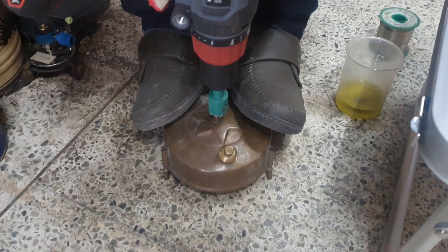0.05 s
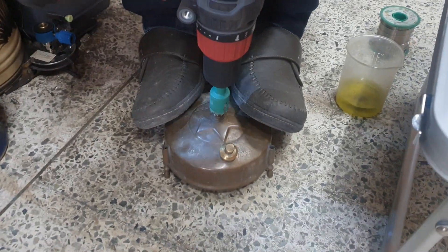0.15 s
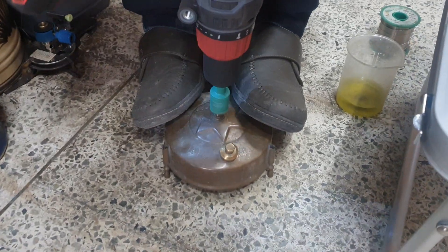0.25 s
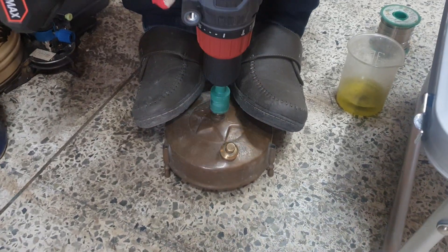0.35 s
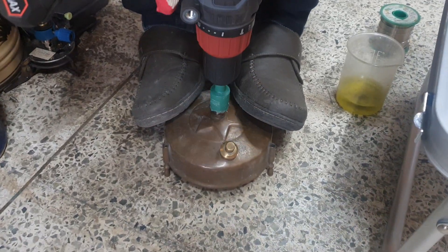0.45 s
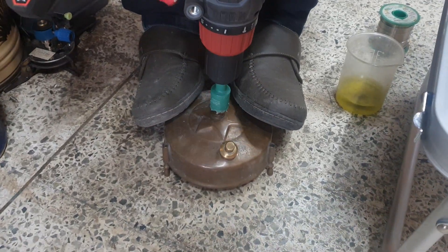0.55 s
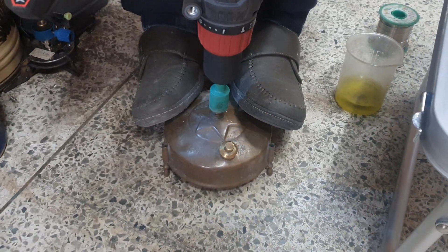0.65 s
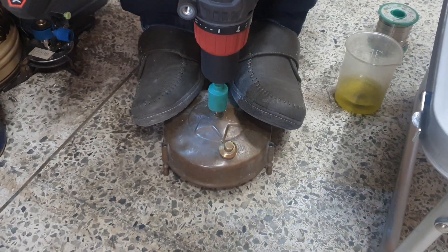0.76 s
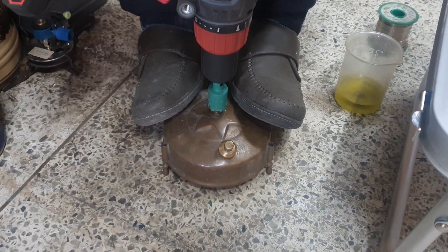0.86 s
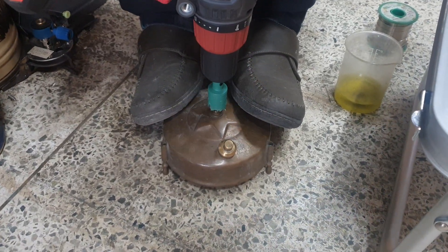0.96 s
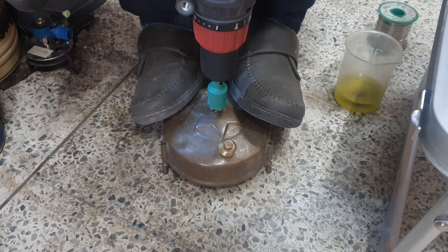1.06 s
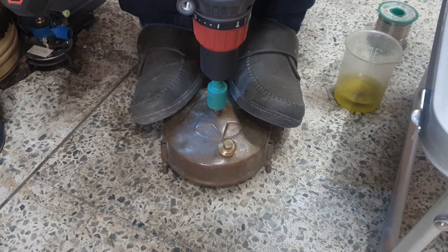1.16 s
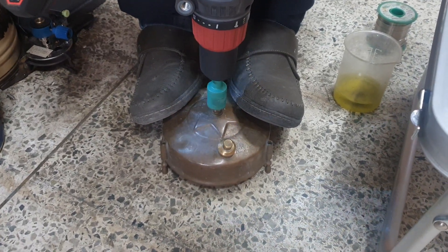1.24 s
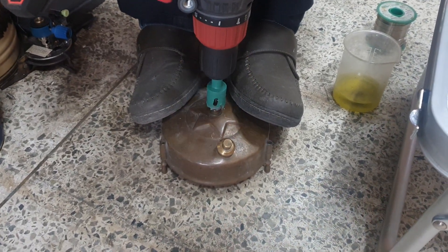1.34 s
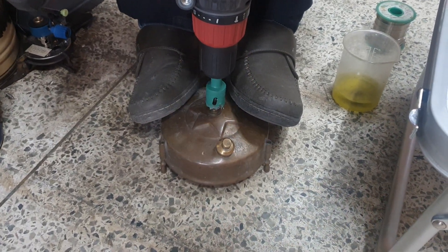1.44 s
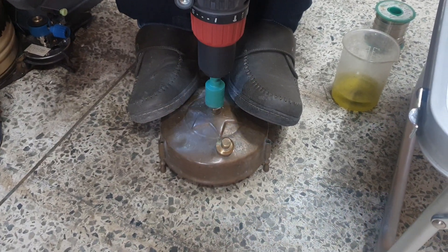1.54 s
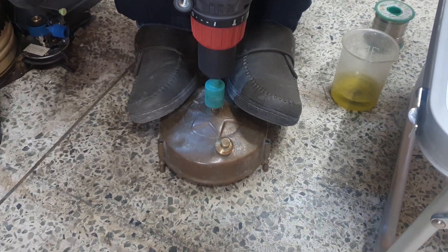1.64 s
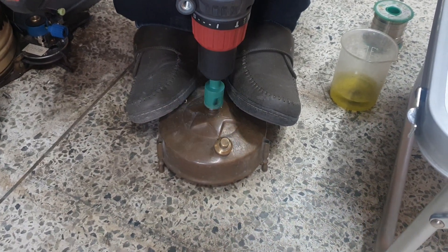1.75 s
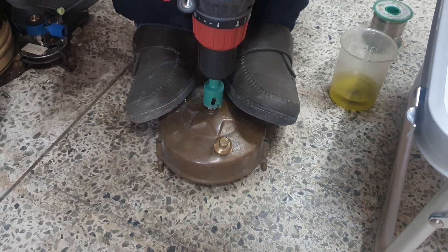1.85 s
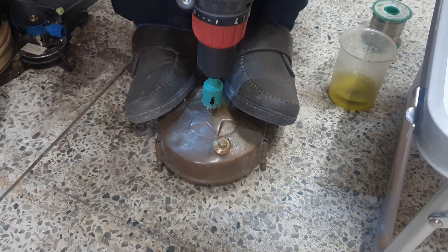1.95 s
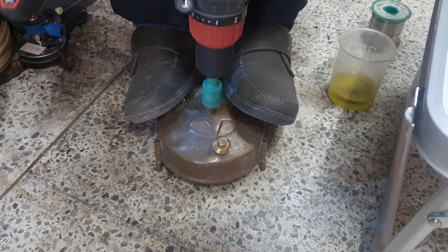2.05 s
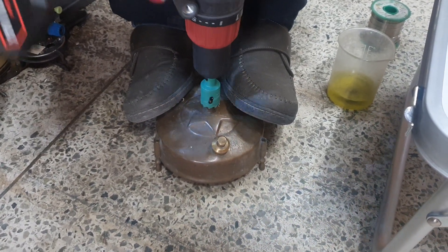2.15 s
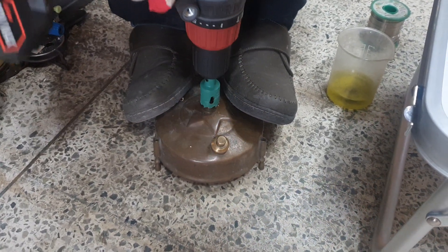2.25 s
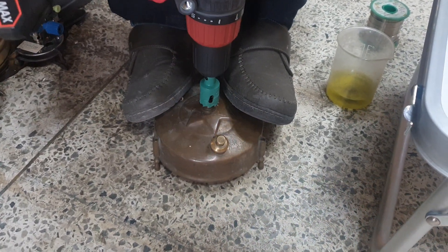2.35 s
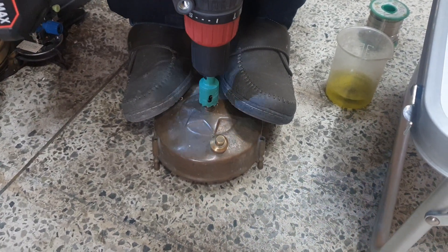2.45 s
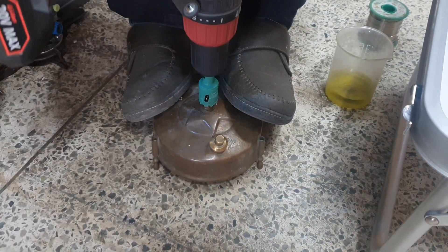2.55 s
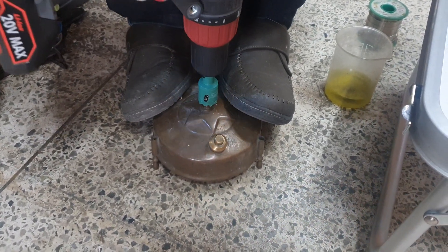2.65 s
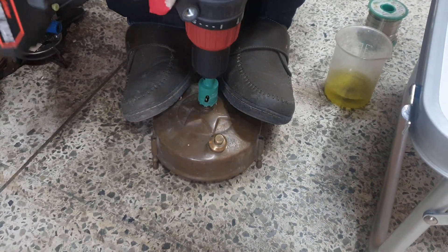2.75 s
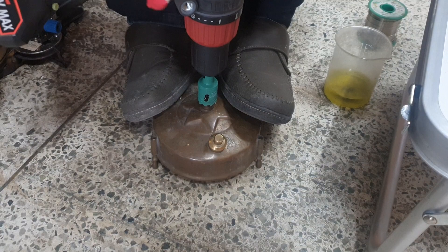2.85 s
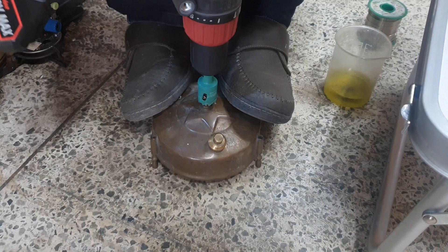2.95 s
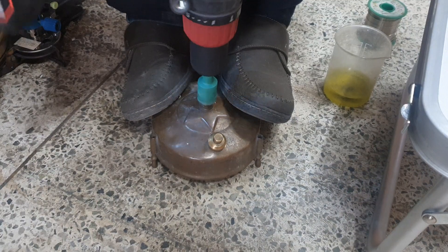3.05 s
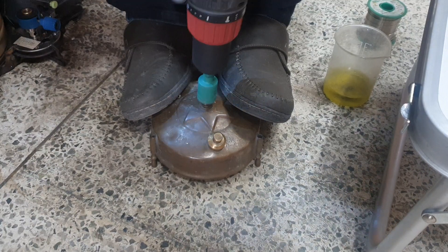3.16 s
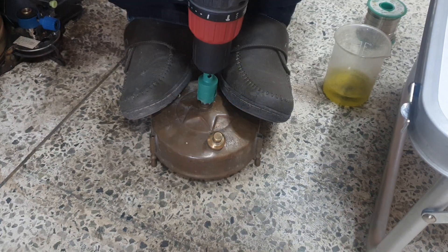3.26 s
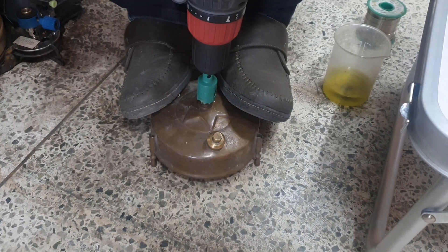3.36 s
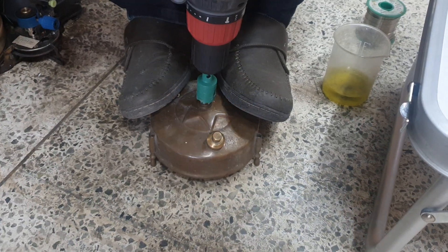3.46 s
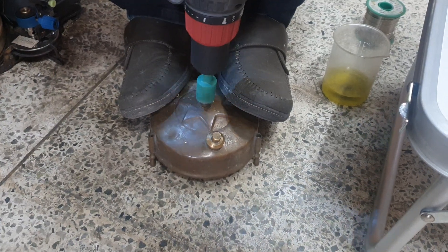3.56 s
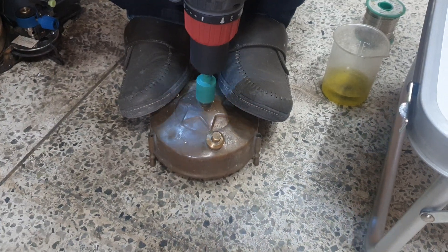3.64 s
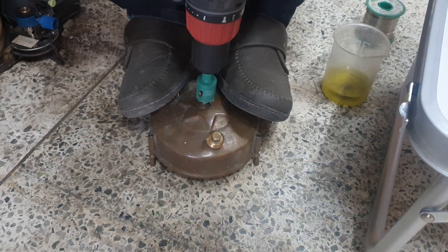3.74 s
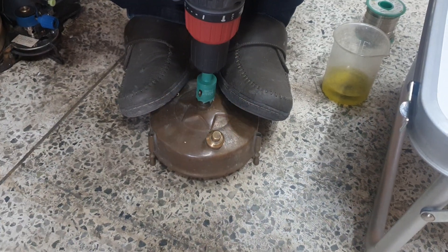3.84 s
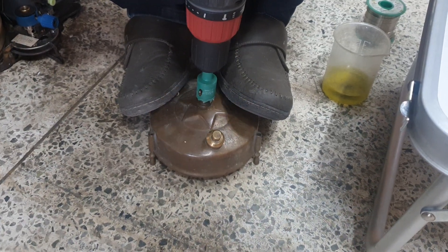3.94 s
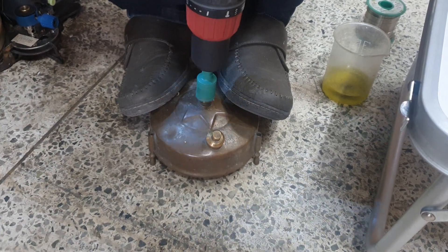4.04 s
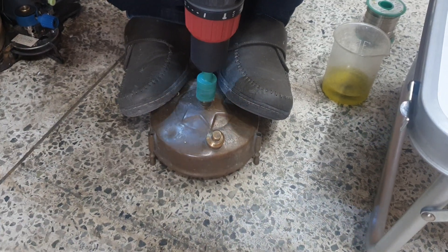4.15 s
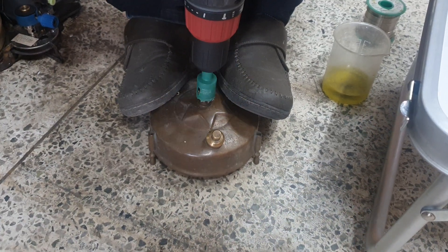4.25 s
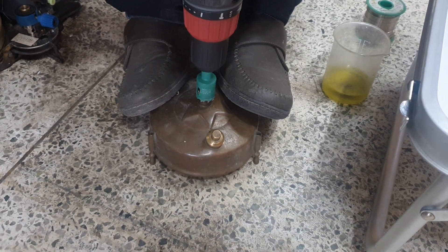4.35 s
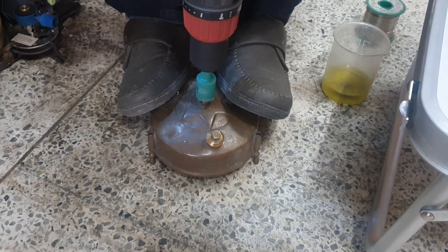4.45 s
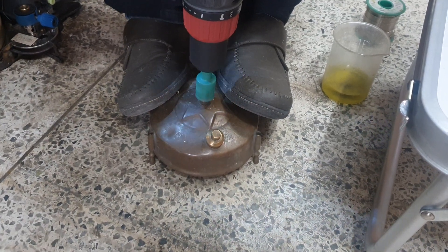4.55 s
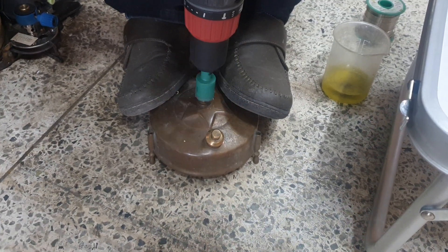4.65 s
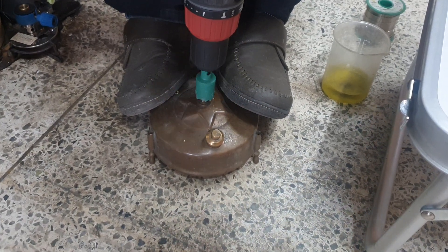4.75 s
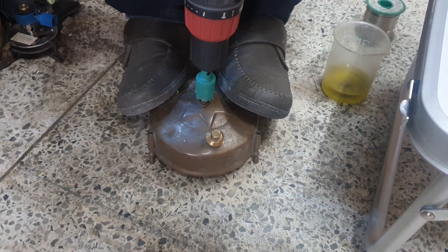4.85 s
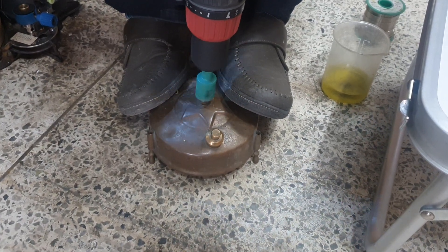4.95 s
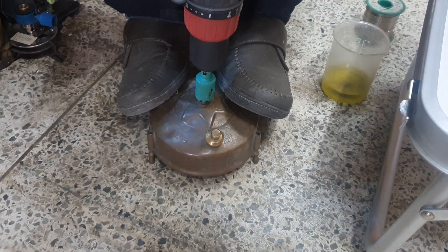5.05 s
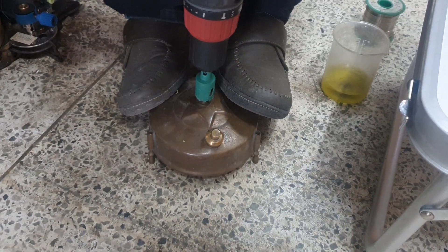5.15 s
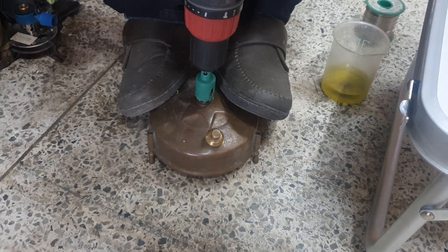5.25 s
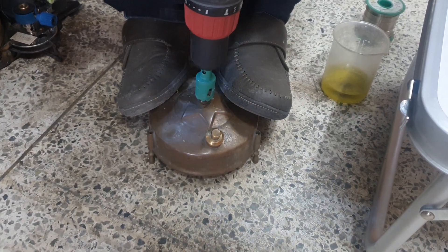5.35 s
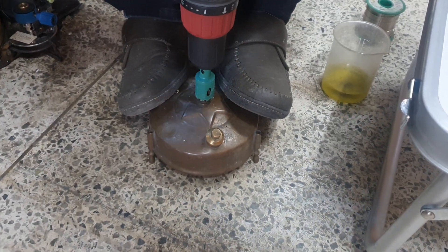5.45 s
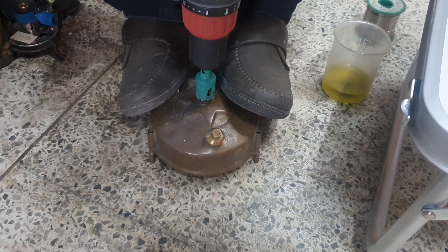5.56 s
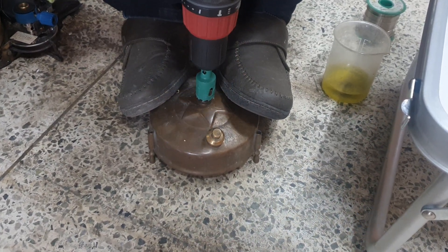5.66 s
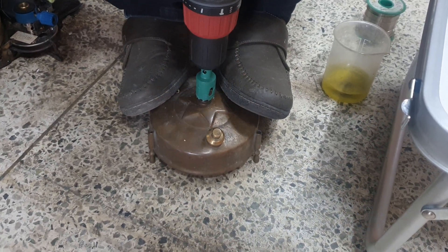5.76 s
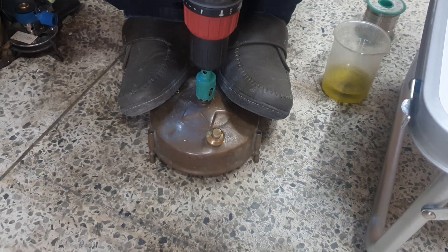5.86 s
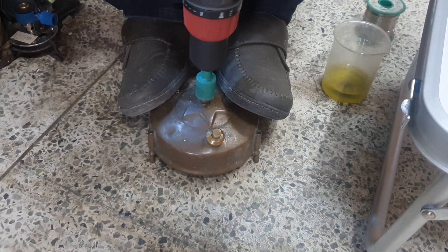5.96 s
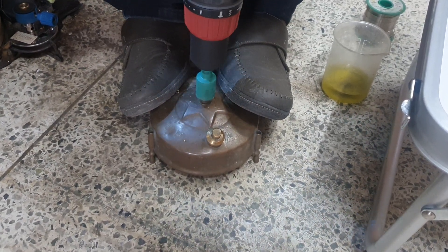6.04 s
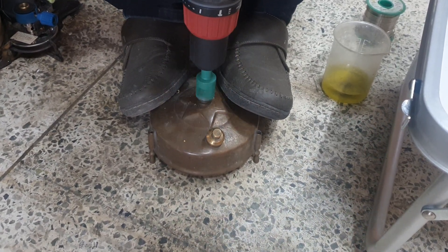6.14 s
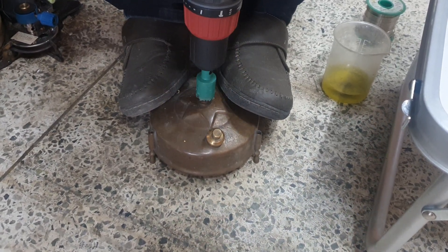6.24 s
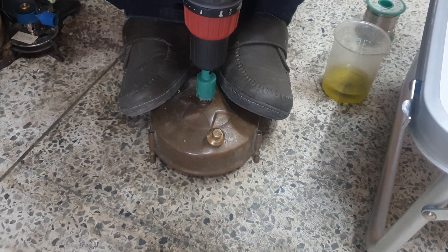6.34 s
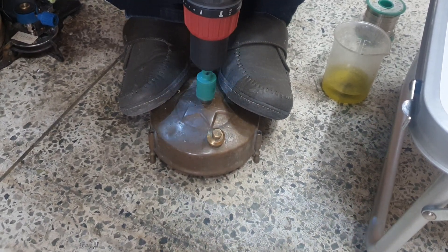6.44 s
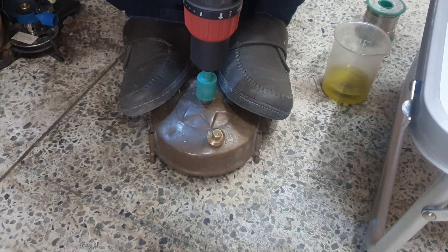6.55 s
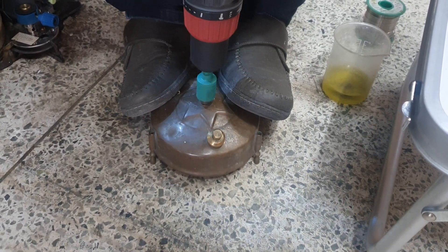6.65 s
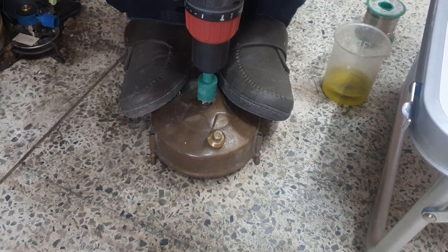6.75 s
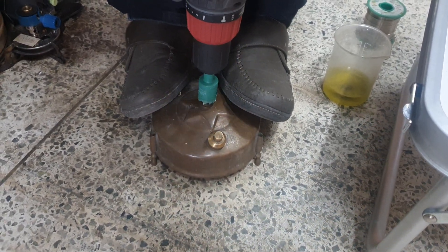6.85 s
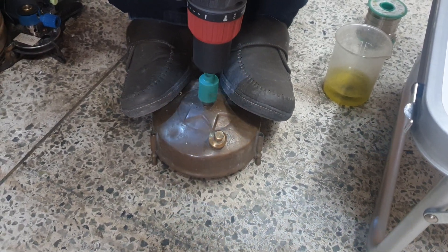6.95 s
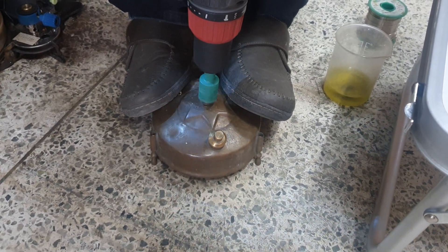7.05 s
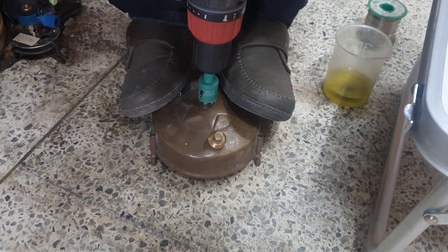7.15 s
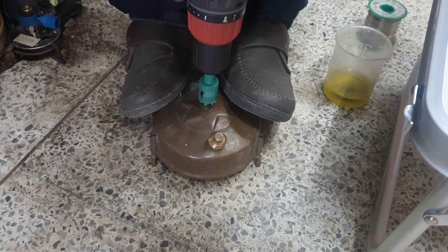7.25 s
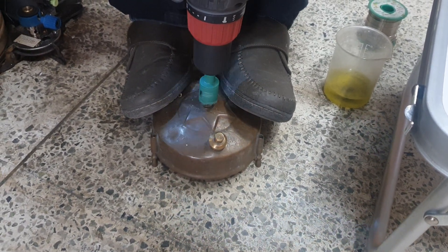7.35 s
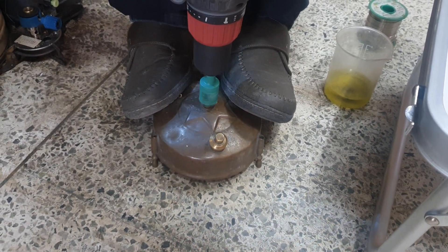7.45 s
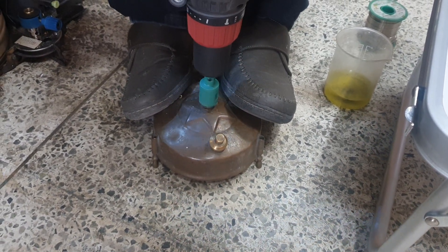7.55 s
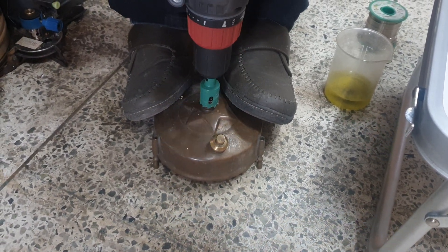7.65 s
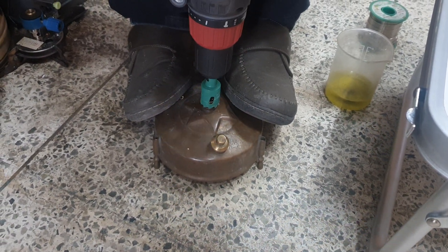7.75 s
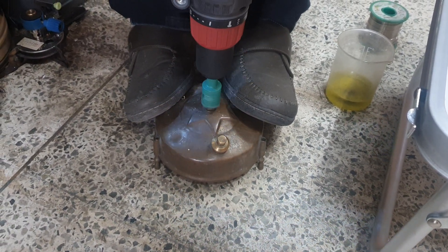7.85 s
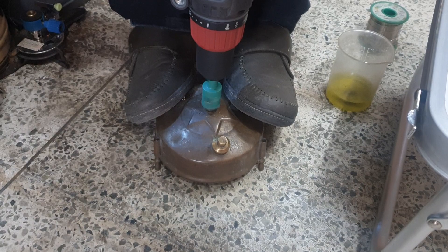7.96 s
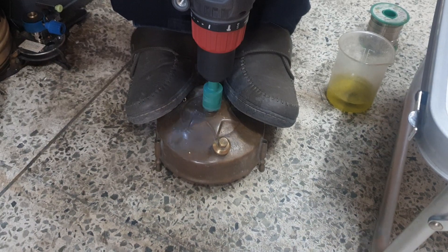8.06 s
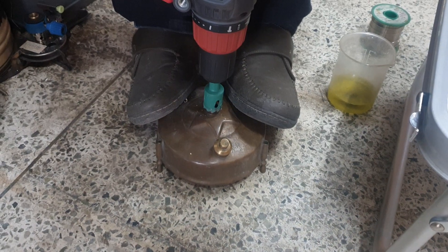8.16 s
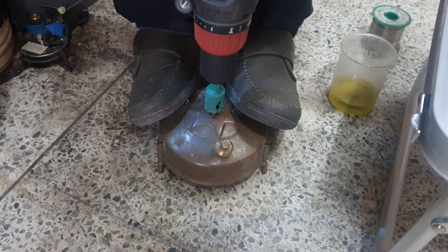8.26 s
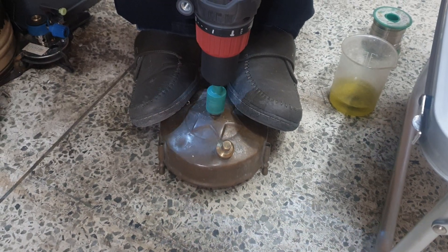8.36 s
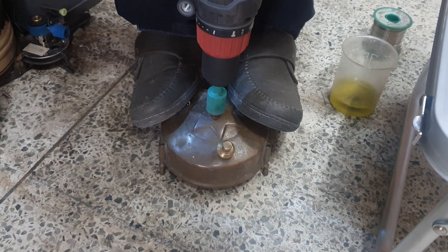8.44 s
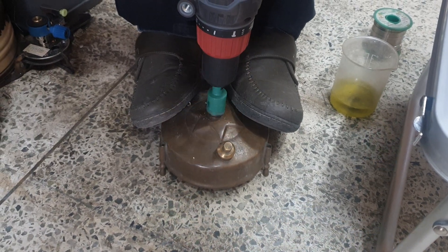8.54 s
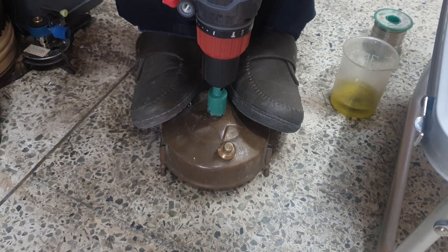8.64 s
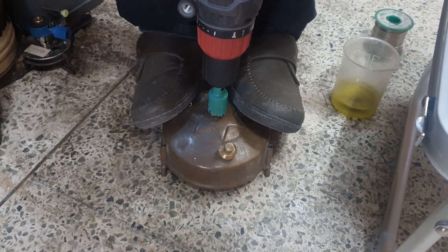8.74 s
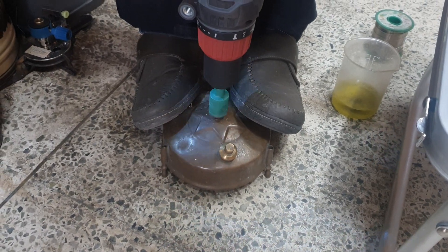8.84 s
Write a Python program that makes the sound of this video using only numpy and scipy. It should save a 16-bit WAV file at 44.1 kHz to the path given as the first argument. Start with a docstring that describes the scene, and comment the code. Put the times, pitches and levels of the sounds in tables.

```python
"""In a room with a stone floor, a cordless drill turns a hole saw on a small metal fuel tank held between
two feet. With each short pull of the trigger the gears whine up and the teeth rasp through the sheet,
ringing the tank. The saw catches with a crack, squeaks as it sticks and slips, and rings as it springs
free. The tank knocks on the floor, the stalled motor whistles faintly, and a low hum fills the room."""
import sys
import numpy as np
from scipy import signal
from scipy.fft import rfft, irfft
from scipy.io import wavfile
from scipy.ndimage import uniform_filter1d

SR = 44100
rng = np.random.default_rng(int(sys.argv[2]) if len(sys.argv) > 2 else 0)


def unload_audio(sound):
    """Save the sound as a 16-bit wav file, at the path given as the first command line argument."""
    columns = np.transpose(np.atleast_2d(sound))
    # keep every value between -1 and 1, then stretch to whole-number steps
    steps = np.round(np.clip(columns, -1, 1) * 32767)
    wavfile.write(sys.argv[1], SR, steps.astype(np.int16))


N = 392490
TIME = np.arange(N) / SR
CUTOFF_HZ = 16000
USUAL_HZ, USUAL_DB = 2300, -23  # whine pitch and cutting force of a typical pull

# Trigger pulls; in the brief, slow ones the saw barely turns:
# start_s, release_s, force_db, early_whine_hz, late_whine_hz
PULLS = [(0.251, 0.412, -27.5, 2600, 2500), (0.718, 0.874, -25.5, 2545, 2445),
         (1.156, 1.343, -27.5, 2303, 2444), (1.6, 1.81, -25, 2326, 2290), (2.053, 2.202, -22.5, 1930, 1700),
         (2.541, 2.57, -40, 450, 450), (2.768, 2.768, -44.5, 452, 450), (3.005, 3.039, -43, 600, 600),
         (3.1, 3.279, -23.5, 2550, 2650), (3.581, 3.78, -22, 2623, 2600), (4.06, 4.279, -23, 2147, 2396),
         (4.521, 4.707, -22.5, 2198, 2305), (4.954, 5.106, -24.5, 3000, 1504),
         (5.411, 5.42, -37.5, 507, 496), (5.653, 5.657, -44, 290, 303), (5.955, 6.003, -28, 1677, 1700),
         (5.992, 6.221, -24.5, 2450, 2779), (6.514, 6.743, -23.5, 2572, 2700),
         (6.976, 7.178, -22, 2293, 2200), (7.439, 7.64, -22, 3300, 2100), (7.894, 8.136, -23, 1300, 2053),
         (8.364, 8.608, -22, 2200, 2246), (8.855, 8.95, -26.5, 1800, 1790)]
# Tone colour of teeth on sheet metal: frequency_hz, gain_db
RASP_SPECTRUM = [(120, -33.5), (204, -2), (390, -16.5), (546, -3.5), (698, -4.5), (1030, -4.5), (1370, -9),
                 (1680, -3), (2590, -5), (3520, -7.5), (7200, -15), (8660, -8.5), (12000, -16),
                 (15500, -20.5)]


def rasp(force, treble, boom, pitch, teeth_per_cycle=.06):
    """Chips break off in surges as each tooth passes; they hiss directly and ring the tank."""
    tooth_hz = pitch * teeth_per_cycle * (1 + .12 * drift(40))
    tooth = np.sin(2 * np.pi * np.cumsum(tooth_hz) / SR)
    bite = force * from_db(0.75 * drift(240) - tooth)  # judder and tooth ripple, in dB
    fractures = spread(chips(per_s=16000, size_db=0.5), chips(per_s=30000, size_db=3.0))
    scrape = rms_one(colour(fractures, RASP_SPECTRUM))
    low, rest = crossover(scrape, hz=1100)
    middle, high = crossover(rest, hz=6430)
    body = from_db(-5.0) * boom * low
    hiss = treble * from_db(7.0 + 0.6 * drift(60)) * high
    return bite * (body + middle + hiss) + tank_ring(bite, boom)


def chips(per_s, size_db):
    """Tiny fractures of the sheet: random clicks, a few much larger than the rest."""
    sizes = from_db(size_db * np.minimum(rng.exponential(1, N), 5))
    return rms_one(sizes * rng.standard_normal(N) * (rng.random(N) < per_s / SR))


def tank_ring(bite, boom, boom_below_hz=1500):
    """Small blows ring the shell; its low modes answer most to how the saw leans on it."""
    # Resonances of the shell: pitch_hz, width_hz, level_db
    tank_modes = [(238, 190, -20), (547, 74, -13), (981, 77, -15), (1113, 69, -15.5), (1684, 43, -10.5),
                  (2598, 260, -5.5)]
    blows = bite * spread(chips(per_s=5000, size_db=2.0), chips(per_s=5000, size_db=1.5))
    ring = 0
    for hz, width_hz, db in tank_modes:
        drive = blows * boom if hz < boom_below_hz else blows
        ring += from_db(db) * np.sqrt(SR / np.pi / width_hz) * resonate(drive, hz, width_hz)
    return from_db(-2.5) * ring / np.sqrt(2)


def pressure(ease_s=0.053, bite_hz_per_s=53600):
    """The teeth bite in, cut and run out; a fast saw hisses, a labouring one makes the tank boom."""
    force, treble, boom = np.zeros((3, N))
    for start, release, db, _, hz in PULLS:
        now = (TIME > start) & (TIME < release + 6 * ease_s)
        biting = (1 - np.exp(-(TIME[now] - start) * bite_hz_per_s / hz)) ** 1.77
        running_out = np.exp(-(np.maximum(TIME[now] - release, 0) / ease_s) ** 3.2)
        force[now] += from_db(db) * biting * running_out
        faster_khz = (hz - USUAL_HZ) / 1000
        treble[now] = from_db(-3.5 + 4.5 * faster_khz)
        boom[now] = from_db(-0.5 - 4.0 * faster_khz)
    return force, treble, boom


def snag(start_s=0.321, rise_s=0.022, decay_s=0.041, force_db=-15.5):
    """Early on the saw snags and chatters across the smooth sheet: extra force flares and dies away."""
    t = np.maximum(TIME - start_s, 0)
    return from_db(force_db) * np.minimum(t / rise_s, 1) * np.exp(-np.maximum(t - rise_s, 0) / decay_s)


def grit(surge_db=1.2, per_s=22):
    """The hiss of the teeth swells and sinks as the saw rocks in its groove."""
    trim_db = np.log(10) / 20 * surge_db ** 2  # holds the average power steady
    return from_db(surge_db * drift(per_s) - trim_db)


def motor(lag_s=.018, spin_up_s=.033, loaded_s=.085, brake_s=.085, fade_db_per_s=25):
    """The motor runs up, follows the load and brakes: pitch, level and growl for the gears."""
    pitch, whine_db, growl_db = np.zeros((3, N))
    for start, release, db, early_hz, late_hz in PULLS:
        now = TIME > start
        t, coasting = TIME[now] - start, np.maximum(TIME[now] - release, 0)
        rising = 1 - np.exp(-np.maximum(t - lag_s, 0) / spin_up_s)
        loaded_hz = np.interp(t, [loaded_s, max(release - start, loaded_s)], [early_hz, late_hz])
        braking = np.maximum(1 - (coasting / brake_s) ** 2, 0)
        pitch[now] = loaded_hz * rising * braking
        # A firmer pull sings out more; as the motor bogs down, whine gives way to slow-gear growl.
        whine_db[now] = -7.0 + .7 * (db - USUAL_DB) - fade_db_per_s * coasting
        growl_db[now] = 5.5 * max(early_hz - late_hz, 0) / 1000
    return pitch, from_db(whine_db), growl_db


def gears(force, pitch, whine, growl_db, wobble=.019, rough_db=3.8, housing_hz=1550):
    """The gearbox sings, wavering with the load; its housing radiates little at low speed."""
    # Tones of the gear train: pitch_ratio, level_db
    gear_tones = [(.25, -13.5), (.5, -11.5), (.75, -21), (1, 3)]
    phase = 2 * np.pi * np.cumsum(pitch * (1 + wobble * drift(110))) / SR
    tones = 0
    for ratio, db in gear_tones:
        tilt_db = growl_db if ratio < 1 else -growl_db / 2
        tones += from_db(db + tilt_db + rough_db * drift(90)) * np.sin(ratio * phase)
    return force * whine * np.minimum(pitch / housing_hz, 1) ** 5 * tones


def catches(crack_s=0.0062, rattle_s=.014, rattle_db=-9.5, bright_hz=5000):
    """A caught tooth lets go with a crack and a short rattle of the sheet."""
    # Teeth catching hard on the rim of the cut: start_s, level_db, treble_db
    hard_catches = [(0.276, -16, 0.5), (0.336, -11.5, 1.5), (0.739, -23, 2), (2.478, -46, 5.5),
                    (2.555, -22, 4.5), (2.662, -38, -17), (2.718, -44, -12), (2.794, -31, -13),
                    (3.021, -24.5, -1), (3.393, -31, -8), (5.734, -31, 0), (5.79, -37.5, -24),
                    (5.814, -29, -23), (5.972, -15.5, -2.5), (5.984, -6, 0.5), (6.289, -20, 12),
                    (6.532, -21.5, 11), (6.805, -32, -8)]
    # Every pull opens with a clack as the teeth take up the slack.
    clacks = [(start + .014, -33.5 + 0.22 * (db - USUAL_DB), -7) for start, _, db, _, _ in PULLS]
    out, t = np.zeros((2, N)), TIME[:SR // 6]
    envelope = np.exp(-t / crack_s) + from_db(rattle_db) * np.exp(-t / rattle_s)
    for start, db, treble_db in hard_catches + clacks:
        crack = rng.standard_normal((2, len(t))) * envelope
        dull = signal.lfilter(*signal.butter(1, bright_hz, fs=SR), crack)
        add(out, start, from_db(db - 9.5) * (dull + from_db(treble_db) * (crack - dull)))
    return butter(colour(spread(*out), RASP_SPECTRUM), 270, "high") * 2


def squeaks(jitter=.038):
    """The saw sticks and slips, giving brief, unsteady tones with overtones."""
    # Stick-slip squeals: peak_s, half_width_s, pitch_hz, level_db, overtone_db
    slips = [(0.36, 0.046, 4620, -23.5, 5), (0.37, 0.028, 2550, -16.5, -10),
             (2.557, 0.0017, 2890, -24, -24), (3.177, 0.0077, 13900, -17, -10),
             (5.127, 0.035, 4395, -25, -20), (6.295, 0.013, 4520, -31.5, 6.5),
             (6.81, 0.0079, 4950, -23.5, 3.5), (7.646, 0.015, 14100, -23, -10)]
    out = np.zeros(N)
    wavering_time = np.cumsum(1 + jitter * drift(350)) / SR
    for peak, half_width, hz, db, overtone_db in slips:
        near = abs(TIME - peak) < np.pi * half_width
        phase = 2 * np.pi * hz * wavering_time[near]
        partials = enumerate(from_db([0, overtone_db, overtone_db - 7.5]), 1)
        tone = sum(gain * np.sin(k * phase) for k, gain in partials if k * hz < CUTOFF_HZ)
        out[near] += from_db(db) * np.exp(-((TIME[near] - peak) / half_width) ** 2) * tone
    return out


def cup_ring(sustain=1.28, low_hz=5000):
    """Freed from the cut, the saw's steel cup rings on in its own modes."""
    # The cup springs free: start_s, level_db, low_mode_gain_db
    releases = [(0.41, -31, 6.5), (4.314, -30, -26)]
    # Modes of the cup: pitch_hz, level_db, base_t60_s (stretched by sustain)
    cup_modes = [(2099, -7, .32), (2455, -17, .31), (3241, -21, .29), (8800, 1, .24)]
    out, t = np.zeros(N), TIME[:SR // 2]
    for start, level_db, low_db in releases:
        for hz, db, t60 in cup_modes:
            envelope_db = level_db + db + low_db * (hz < low_hz) - 60 * t / (t60 * sustain)
            add(out, start, from_db(envelope_db) * np.sin(2 * np.pi * hz * t))
    return out


def bumps(thud_hz=170, width_hz=130, decay_s=0.013):
    """Soft, low knocks of the tank against floor and shoes."""
    # The tank rocks: start_s, level_db
    knocks = [(2.235, -30), (5.099, -31), (6.865, -41.5), (6.918, -42.5), (6.969, -39.5), (7.691, -33.5),
              (8.177, -37)]
    out, t = np.zeros(N), TIME[:SR // 8]
    for start, db in knocks:
        add(out, start, from_db(db + 21.5) * rng.standard_normal(len(t)) * np.exp(-t / decay_s))
    return butter(resonate(out, thud_hz, width_hz), 350, "low")


def drive_whistle():
    """The switched current sings in the windings of the stalled motor."""
    # Stalls of the saw: start_s, end_s, level_db
    stalls = [(2.62, 2.79, -64), (5.485, 5.678, -76)]
    gate = sum(from_db(db) * ((TIME > start) & (TIME < end)) for start, end, db in stalls)
    return uniform_filter1d(gate, SR // 100) * narrow_noise(N, hz=11550, width_hz=70)


def room(x, wet_db, predelay_s=.006):
    """Diffuse reflections off stone and walls, dying sooner in the treble."""
    # Reverb decay: frequency_hz, t60_s
    decay_times = [(200, 0.31), (2000, 0.21), (6000, 0.2), (15000, 0.16)]
    t, edges = TIME[:SR * 2 // 3], np.geomspace(100, CUTOFF_HZ, 8)
    tail = 0
    for low, high in zip(edges, edges[1:]):
        bandpass = signal.butter(2, [low, high], "band", fs=SR, output="sos")
        band = signal.sosfilt(bandpass, rng.standard_normal((2, len(t))))
        tail += band * from_db(-60 * t / at_hz(decay_times, np.sqrt(low * high))) * (t > predelay_s)
    return from_db(wet_db) * signal.fftconvolve(x, rms_one(tail) / np.sqrt(len(t)), axes=1)[:, :N]


def background(hum_hz=64, hum_db=-57.5, rumble_db=-60.5, air_db=-64.5):
    """A wavering low hum and a diffuse rumble over the quiet air of the room."""
    # Room tone: frequency_hz, gain_db
    air_spectrum = [(25, 12), (45, -3.5), (80, 2.5), (130, 0.5), (400, -8.5), (900, -21.5), (1700, -12.5),
                    (2600, -16.5), (6300, -28), (10000, -16.5), (15000, -26)]
    air = rms_one(colour(spread(*rng.standard_normal((2, N))), air_spectrum))
    hum_phase = 2 * np.pi * np.cumsum(hum_hz + 2 * drift(9)) / SR
    hum = np.sqrt(2) * np.sin(hum_phase) * from_db(2.5 * drift(9))
    rumble = narrow_noise((2, N), hz=54, width_hz=22)
    return from_db(air_db) * air + from_db(hum_db) * hum + from_db(rumble_db) * rumble


def spread(centre, side):
    """Two unrelated sounds become a stereo pair, alike in the bass and wider in the treble."""
    # Likeness of left and right: frequency_hz, correlation
    likeness = [(100, .9), (700, 0.77), (1500, 0.7), (3000, 0.29), (14000, 0.46)]
    mid = colour(centre, [(hz, 10 * np.log10(1 + alike)) for hz, alike in likeness])
    width = colour(side, [(hz, 10 * np.log10(1 - alike)) for hz, alike in likeness])
    return mid + width * [[1], [-1]]


def colour(x, spectrum, size=4096):
    """Minimum-phase EQ through (frequency_hz, gain_db) points."""
    cepstrum = irfft(np.log(from_db(at_hz(spectrum, np.arange(size // 2 + 1) * SR / size))))
    cepstrum[1:size // 2] *= 2
    cepstrum[size // 2 + 1:] = 0
    impulse = irfft(np.exp(rfft(cepstrum)))
    return signal.fftconvolve(np.atleast_2d(x), impulse[None], axes=1)[:, :N]


def narrow_noise(shape, hz, width_hz):
    """Pitched noise of unit power: white noise through the same resonance twice."""
    return rms_one(resonate(resonate(rng.standard_normal(shape), hz, width_hz), hz, width_hz))


def resonate(x, hz, width_hz):
    """A resonance with unity gain at its peak."""
    r = np.exp(-np.pi * width_hz / SR)
    feedback = [1, -2 * r * np.cos(2 * np.pi * hz / SR), r * r]
    return signal.lfilter(np.array([1, 0, -1]) * (1 - r * r) / 2, feedback, x + 1e-18)


def crossover(x, hz):
    """Split into a low and a high part that add up flat."""
    return butter(butter(x, hz, "low"), hz, "low"), butter(butter(x, hz, "high"), hz, "high")


def butter(x, hz, kind):
    """Second-order low- or high-pass."""
    return signal.sosfilt(signal.butter(2, hz, kind, fs=SR, output="sos"), x)


def drift(rate_hz):
    """Smooth random wander of unit power that changes at about the given rate."""
    knots = rng.standard_normal(N // 8)
    return rms_one(np.interp(TIME * rate_hz * 2, np.arange(len(knots)), knots))


def at_hz(points, hz):
    """Read a table on a log-frequency axis."""
    frequencies, values = np.array(points).T
    return np.interp(np.log(np.maximum(hz, 1)), np.log(frequencies), values)


def add(out, start_s, sound):
    """Mix a short sound in at a time."""
    i = max(int(start_s * SR), 0)
    out[..., i:i + sound.shape[-1]] += sound[..., :max(N - i, 0)]


def from_db(db):
    """Decibels to gain."""
    return 10 ** (np.asarray(db) / 20)


def rms_one(x):
    """Scale to unit power."""
    return x / np.sqrt(np.mean(x ** 2) + 1e-20)


def scene():
    """The work sits to the left, louder and a little earlier on that side, over the room tone."""
    # Stereo balance of the work: frequency_hz, left_minus_right_db
    balance = [(100, 6), (290, 0.5), (640, 8), (1400, 7.5), (3100, 10.5), (6000, 11), (9000, 3.5),
               (13500, 14)]
    pitch, whine, growl_db = motor()
    steady, treble, boom = pressure()
    force = steady + snag()
    boom = boom * steady / (force + 1e-9)  # chatter adds no boom
    cutting = rasp(force, treble * grit(), boom, pitch) + gears(steady, pitch, whine, growl_db)
    work = cutting + catches() + squeaks() + cup_ring() + bumps() + drive_whistle()
    left, right = work + room(work, wet_db=-15.0)
    left = colour(left, [(hz, db / 2) for hz, db in balance])
    right = colour(np.roll(right, 3), [(hz, -db / 2) for hz, db in balance])
    return from_db(-2.0) * np.vstack([left, right]) + background()


def record(dry):
    """The top of the treble is cut steeply."""
    return signal.sosfilt(signal.ellip(10, .1, 80, CUTOFF_HZ, fs=SR, output="sos"), dry)


dry = scene()
out = record(dry)
unload_audio(out)
```